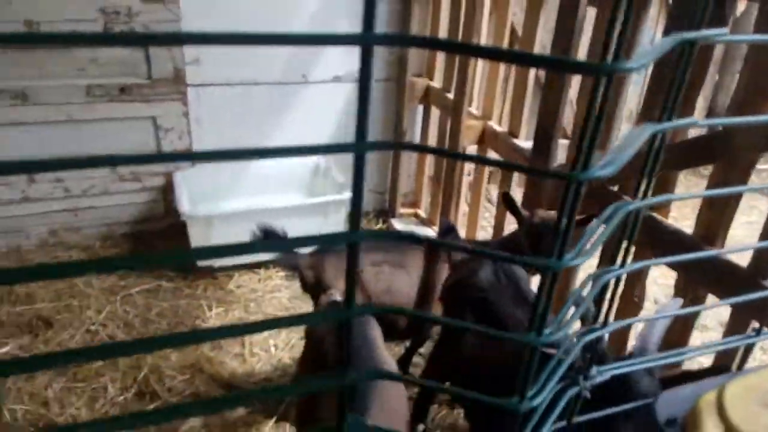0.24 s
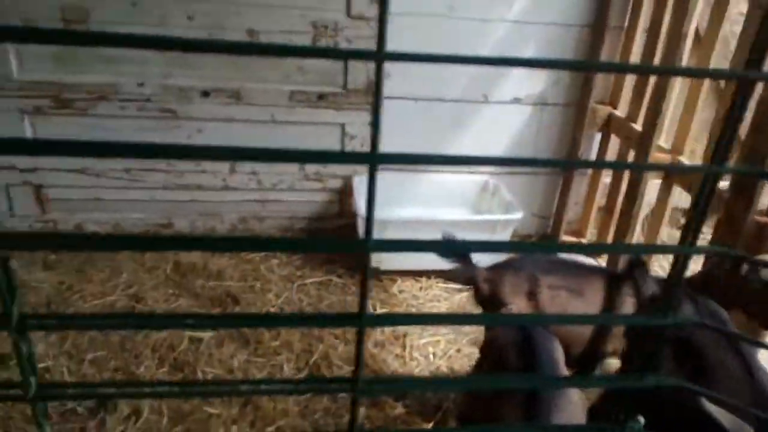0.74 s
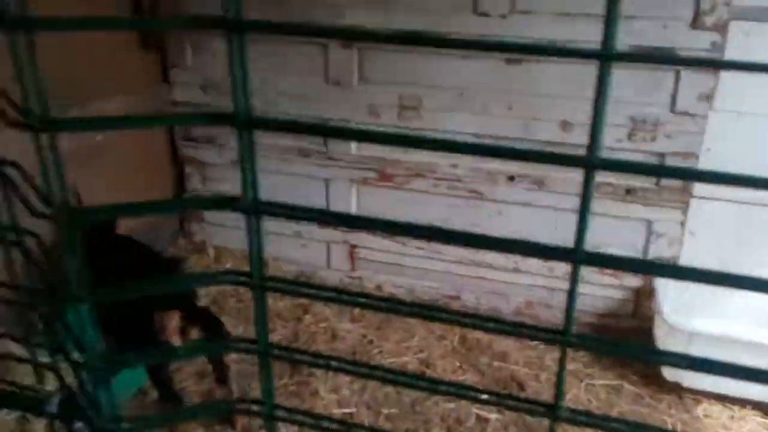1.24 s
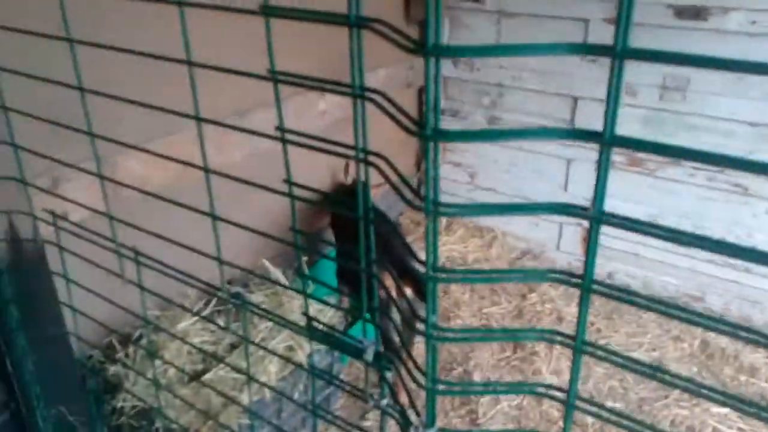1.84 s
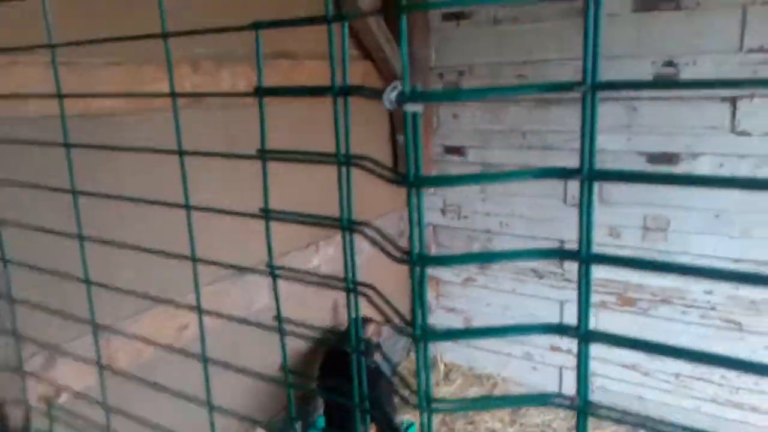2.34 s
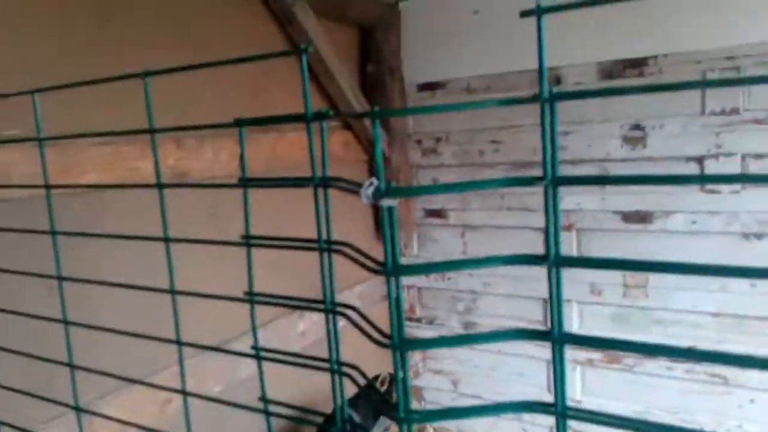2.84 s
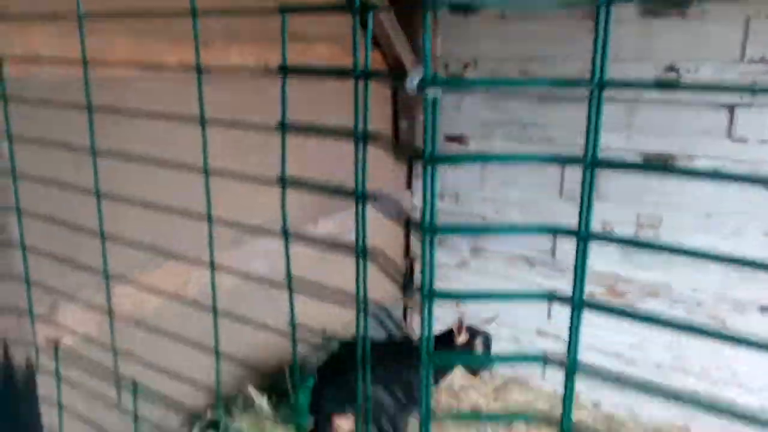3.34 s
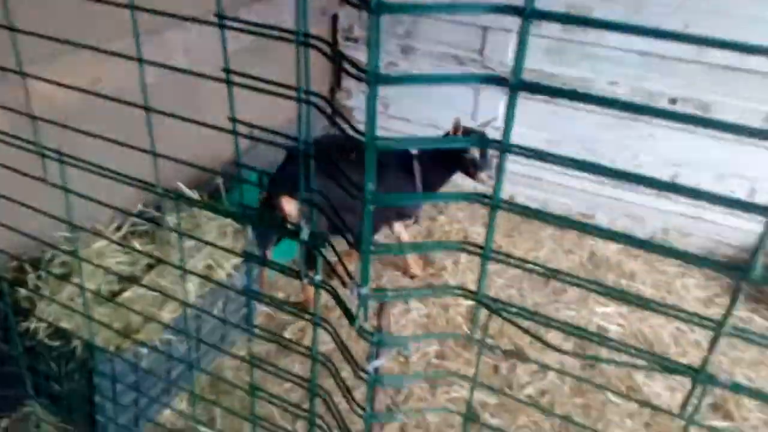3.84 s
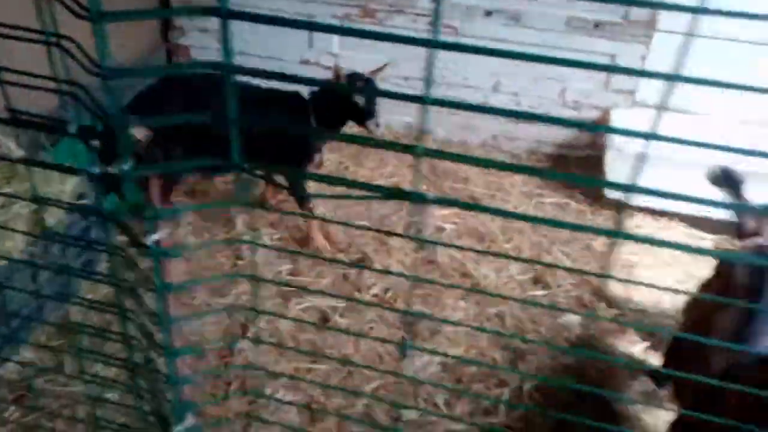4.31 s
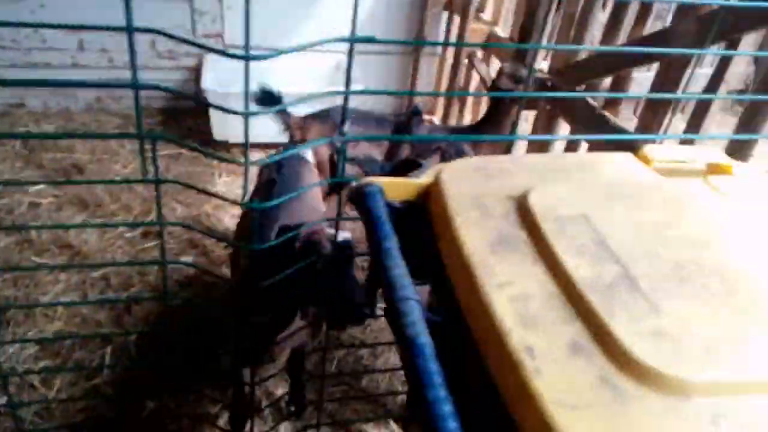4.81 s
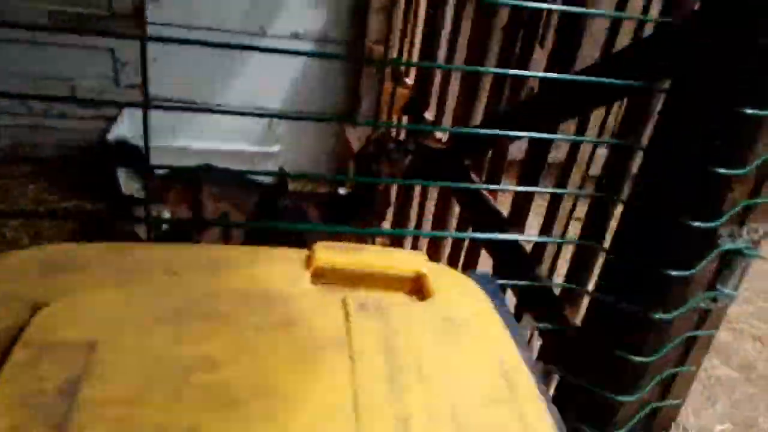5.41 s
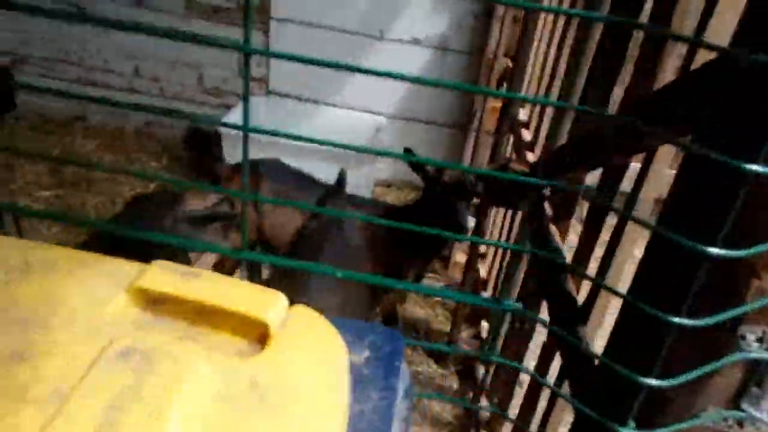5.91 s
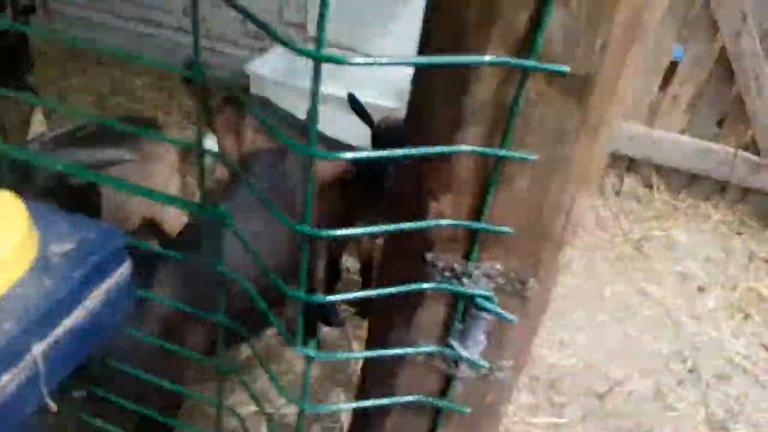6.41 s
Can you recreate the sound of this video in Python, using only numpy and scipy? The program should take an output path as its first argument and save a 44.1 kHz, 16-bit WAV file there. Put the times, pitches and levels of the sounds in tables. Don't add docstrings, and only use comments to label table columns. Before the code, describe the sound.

A goat pen in a wooden shed, heard close through a small stereo microphone with a very faint high whine for the first three seconds. From 0 s straw rustles and crackles with light knocks and snaps; harder board blows land at 0.65 and, loudest, 0.82 s. A hollow bin is pushed and knocked at 1.3 s and again near 1.6 s. From 1.9 to 2.5 s a goat gives a thin, short bleat broken by deep dips, with board knocks at 2.15 s. At 3.07 s a blow briefly rattles the mesh; a faint bird whistle slides down from 3.15 to 3.85 s, with dull knocks around 3.45 s. A steady bird note sounds at 3.9 s. From 4.2 to 5 s another goat bleats, deeply quavering, then more evenly. Light straw follows, with a far goat murmur at 5-5.5 s, a tiny squeak, a hinge squealing and creaking from 5.85 s, and a last chirp at 6.6 s.

```python
import sys
import numpy as np
from scipy import signal
from scipy.fft import rfft, irfft, next_fast_len
from scipy.io import wavfile
from scipy.ndimage import uniform_filter1d, map_coordinates

SR = 44100
rng = np.random.default_rng(int(sys.argv[2]) if len(sys.argv) > 2 else 0)


def invert_db(x):
    u = np.asarray(x, float) / 20
    return 10 ** u


def wav_record(signal):
    frames = np.transpose(np.atleast_2d(signal))
    bounded = np.clip(frames, -1, 1)
    quanta = np.round(bounded * 32767).astype(np.int16)
    wavfile.write(sys.argv[1], SR, quanta)


N = 293441


def unit(x):
    return x / np.sqrt(np.mean(x ** 2) + 1e-20)


def along(points, hz):
    f, v = np.transpose(points)
    return np.interp(np.log(hz + 1), np.log(f + 1), v)


def curves(rows):
    s, *cols = np.transpose(rows)
    t = np.arange(N) / SR
    gate = np.clip(np.minimum(t - s[0], s[-1] - t) / 0.0048, 0, 1) if s[0] > 0 else np.ones(N)
    return [np.interp(t, s, c) for c in cols] + [gate]


def swells(rows):
    s, half, *lifts = np.transpose(rows)[:, :, None]
    bell = np.exp(-((np.arange(N) / SR - s) / half) ** 2)
    return [(db * bell).sum(axis=0) for db in lifts]


def wobble(rate, live=slice(None)):
    coarse = np.arange(0, N + 32, 32)
    knots = rng.standard_normal(int(N * rate / SR) + 4)
    return np.interp(np.arange(N)[live], coarse, map_coordinates(knots, [coarse * rate / SR]))


def filtered(x, response):
    m = next_fast_len(N + 8192)
    return irfft(rfft(x, m) * response(np.fft.rfftfreq(m, 1 / SR)), m)[..., :N]


# (frequency [Hz], correlation [0-1])
PORT_LIKENESS = [(60, 0.64), (180, 0.89), (550, 0.21), (1650, 0.0092), (4970, 0.0076), (15000, 0.01)]


def likeness(hz):
    return np.clip(along(PORT_LIKENESS, hz), 0, 1)


# (frequency [Hz], t60 [s])
SHED_T60 = [(100, 0.35), (500, 0.17), (2000, 0.24), (7000, 0.14)]


def shed(x, length, reach=0.99):
    a, b = rng.standard_normal((2, int(.4 * SR)))
    hz, t, z = signal.stft(np.array([a, b]), SR, nperseg=256)
    like = likeness(hz)[:, None]
    z[1] = like * z[0] + np.sqrt(1 - like ** 2) * z[1]
    decay = invert_db(-60 * t / (reach * along(SHED_T60, hz)[:, None]))
    tail = signal.istft(z * decay, SR, nperseg=256)[1]
    return signal.fftconvolve(x[None], tail / np.linalg.norm(tail[0]), axes=1)[:, :length]


def tone(rows, overtone_db, unsteady, flutter_db=4.5):
    hz, level_db, gate = curves(rows)
    turn = 2 * np.pi * np.cumsum(hz * (1 + unsteady * wobble(60))) / SR
    level = invert_db(level_db - 1.0 + flutter_db * wobble(25)) * gate
    return level * (np.sin(turn) + invert_db(overtone_db) * np.sin(2 * turn))


# (time [s], pitch [Hz], level [dB])
WHINE_PATH = [(0.0, 8285, -82), (0.01, 8370, -88.5), (1.5, 8150, -89), (3.05, 7950, -85.5),
              (3.1, 8260, -106)]


def camera_whine():
    return tone(WHINE_PATH, overtone_db=-53, unsteady=0.0013) * invert_db([[3], [-3]])


def rush(spectrum, patchy_db, grain_db):
    grains = rng.exponential(size=N // 40 + 1).repeat(40)[:N]
    spikes = invert_db(grain_db * uniform_filter1d(grains, size=60) / 2)
    z = signal.stft(rng.standard_normal((2, N)) * spikes, nperseg=1024)[2]
    field = rng.standard_normal(z.shape[1:])
    field = uniform_filter1d(uniform_filter1d(field, size=5, axis=0), size=5, axis=1)
    pair = signal.istft(z * invert_db(patchy_db * unit(field)), nperseg=1024)[1][:, :N]

    def mid_side(hz):
        angle = np.arccos(likeness(hz)) / 2
        return invert_db(along(spectrum, hz)) * [np.cos(angle), np.sin(angle)]

    mid, side = filtered(pair, mid_side)
    return unit(np.array([mid + side, mid - side]))


# (frequency [Hz], level [dB])
RUMBLE_COLOUR = [(12, -44.5), (20, -18.5), (70, 2), (176, -7), (231, -17.5), (268, -4.5), (300, -11.5),
                 (390, -59), (660, -120)]
RUSTLE_COLOUR = [(88, -13.5), (150, -5), (238, -8), (511, 1), (669, -5), (715, -1.5), (846, -3.5),
                 (2200, -11.5), (2860, -12), (4840, -120)]
CRACKLE_COLOUR = [(710, -26), (1200, -15), (1640, -37), (2080, -6), (2650, -1.5), (2840, -0.5), (3190, 1.5),
                  (3870, 2), (5340, 2.5), (6160, -1.5), (9000, -34.5), (11700, -64), (19800, -120)]
FIZZ_COLOUR = [(5000, -36.5), (8500, -6), (10600, -4.5), (14100, -2), (15300, 0), (15600, -31)]
# (time [s], rustle level [dB])
BUSYNESS = [(0, -49), (.6, -51), (.74, -59), (.9, -53.5), (1.32, -71), (1.614, -51), (1.9, -56.5),
            (2.3, -58), (2.78, -64.5), (3.21, -64.5), (3.29, -58.5), (3.56, -61.5), (3.7, -68.5),
            (4.12, -63), (5.05, -59), (5.29, -64.5), (5.95, -69.5), (6.65, -67)]
# (time [s], half length [s], rustle lift [dB])
BEDDING_DRAGS = [(.33, 0.046, -4.5), (.49, 0.017, -4), (1.22, 0.039, 2), (1.88, 0.043, 5),
                 (1.97, 0.025, -8), (2.93, 0.12, -0.5), (5.2, .08, -3), (1.76, 0.041, 2), (5.47, 0.073, 1),
                 (5.71, 0.025, 3), (5.82, 0.052, -4.5), (6.18, 0.045, 6)]
# (time [s], half length [s], rumble lift [dB])
BODY_SHOVES = [(0.0, 0.091, 6), (.48, .08, 9), (1.0, 0.29, 15.5), (1.466, 0.12, 16.5), (1.68, 0.11, 14),
               (2.28, 0.13, 14.5), (3.16, .12, 19.5), (3.56, 0.12, 12.5), (5.47, 0.18, 11.5),
               (5.95, 0.11, 7.5), (6.36, 0.22, 7.5)]
# (time [s], half length [s], crackle lift [dB], fizz lift [dB])
STRAW_SCUFFS = [(.1, 0.29, 3.5, 7.5), (.55, 0.098, 7, 14.5), (.83, 0.012, -6.5, 20.5),
                (1.02, 0.037, 4.5, 2), (1.88, 0.029, 3, 2), (2.5, 0.15, 7, 2), (2.62, 0.03, 9, 13),
                (2.0, 0.025, 1.5, 7), (5.15, 0.11, 3.5, 1), (5.95, .08, 1.5, 2), (6.38, 0.05, 1.5, 3),
                (3.33, 0.032, 8, 13), (3.865, 0.025, 7, 3), (3.91, .04, 2, .5), (1.65, 0.016, 6, 1),
                (4.75, 0.14, .1, 3.5), (4.31, 0.027, -6, 8), (5.43, 0.083, 2, -1), (5.72, 0.087, 5, 4),
                (6.17, 0.22, 4.5, 3.5), (6.54, 0.037, 6.5, 10)]


def straw():
    rustle_db = curves(BUSYNESS)[0] + swells(BEDDING_DRAGS)[0]
    shove_db, = swells(BODY_SHOVES)
    scuff_db, fizz_db = swells(STRAW_SCUFFS)
    busier_db = rustle_db + 61
    rumble_db = -73.5 + 0.18 * busier_db + shove_db
    crackle_db = -62.5 + 0.41 * busier_db + scuff_db
    stir = wobble(6.4)
    rumble = invert_db(rumble_db + 3 + 2.5 * wobble(9)) * rush(RUMBLE_COLOUR, patchy_db=2, grain_db=0)
    rustle = invert_db(rustle_db + 3 + 1.2 * stir + 1.5 * wobble(25))
    rustle = rustle * rush(RUSTLE_COLOUR, patchy_db=2.2, grain_db=3.5)
    crackle = invert_db(crackle_db + 2.2 + 1.2 * stir + .8 * wobble(25))
    crackle = crackle * rush(CRACKLE_COLOUR, patchy_db=1.4, grain_db=3.5)
    fizz = invert_db(-88.5 + fizz_db + 1.5) * rush(FIZZ_COLOUR, patchy_db=1.0, grain_db=3.5)
    return (rumble + rustle + crackle) * invert_db([[-.6], [.6]]) + fizz * invert_db([[1.5], [-1.5]])


# (time [s], lag of the left port [samples])
LEFT_LAG = [
    (0, 6),
    (.65, 8),
    (.83, 10),
    (1.3, 4),
    (1.6, 2),
    (2.15, -7),
    (3.07, 0),
    (3.45, 2),
    (6.6, 2),
]


def left_lag(s):
    return np.interp(s, *np.transpose(LEFT_LAG))


# (time [s], peak [dB], strongest mode [Hz], crack [dB], t60 [s])
BOARD_BLOWS = [(.007, -26, 580.5, -21, 0.21), (.143, -29, 356, -17, 0.14), (.217, -33, 1283, -14.5, 0.16),
               (.645, -25, 748, -22, 0.2), (.65, -26, 241, -27.5, 0.22), (.654, -18.5, 744, -23, 0.11),
               (.821, -10.5, 381, -22, 0.17), (.837, -15.5, 330, -24, 0.15),
               (1.59, -28.5, 1022, -35, 0.087), (2.153, -20.5, 163, -18.5, .08),
               (2.16, -19, 278, -20, 0.13), (2.168, -21.5, 517, -28.5, 0.15),
               (2.219, -20.5, 275, -22.5, 0.11), (2.232, -31, 851, -31, 0.15),
               (3.069, -19.5, 256, -25.5, 0.081), (3.074, -23, 787, -20.5, 0.15),
               (3.088, -30, 818, -26, 0.2), (3.103, -26.5, 927, -17, 0.077), (3.11, -23, 697, -19.5, 0.18),
               (3.431, -19, 255.6, -47, 0.16), (3.444, -19, 399, -34, 0.14),
               (3.456, -21.5, 603, -31, 0.079), (3.467, -15, 711, -31, 0.14),
               (3.481, -14.5, 705, -38, 0.078)]
# (time [s], peak [dB], strongest mode [Hz], crack [dB], t60 [s])
BIN_BLOWS = [
    (.259, -35, 305, -23.5, 0.084),
    (.392, -34, 810, -8, 0.22),
    (1.293, -34, 150, -65, 0.2),
    (1.318, -27, 175, -65, 0.15),
    (1.337, -14.5, 731, -15.5, 0.17),
    (1.34, -18, 278, -21.5, 0.18),
    (1.583, -21.5, 445, -28, 0.13),
    (1.629, -28, 450, -28, 0.082),
    (4.049, -53.5, 610, 2, 0.12),
    (6.328, -50, 274, -10, 0.077),
]
# (time [s], peak [dB], strongest mode [Hz], crack [dB])
STRAW_STEPS = [(.44, -36.5, 347, -20), (.511, -34.5, 294, -6.5), (.571, -37, 289, -4.5),
               (2.57, -45, 269, -18), (2.61, -44.5, 498, -1.5), (3.279, -40.5, 344, -16),
               (3.308, -34, 614, -12), (3.322, -38.5, 956, -3.5), (3.382, -37, 733, -20),
               (5.42, -54, 523, -40), (6.166, -43.5, 527, -22)]


def blows():
    steps = [(*row, 0.19) for row in STRAW_STEPS]
    kinds = [(BOARD_BLOWS, -18.5), (BIN_BLOWS, -8), (steps, -18)]
    return sorted((s, db, hz, thump_db, crack_db, t60)
                  for rows, thump_db in kinds for s, db, hz, crack_db, t60 in rows)


# (frequency [Hz], level [dB], share of the blow's t60)
BOARD_MODES = [(103.7, -10.5, 1.98), (150, -16.5, 1.77), (235, -3.5, 1.43), (330, -5, 1.23),
               (387.3, -4.5, 0.96), (459.4, -5, 0.95), (573, -12, 1.1), (646, -14.5, 1.2), (705, 0.5, 0.63),
               (851, -9.5, 0.63), (1045, -17, 0.67), (1190, -14, 0.54)]
# (frequency [Hz], level [dB per Hz])
THUD_COLOUR = [(59, -43.5), (100, -14.5), (207, -6), (546, -7), (705, -4.5), (1350, -12), (2500, -12.5),
               (3250, -60), (5500, -120)]
# (frequency [Hz], level [dB])
MIC_RESPONSE = [(30, -10.5), (70, 1.5), (5500, -2.5), (7000, -14.5), (8200, -34.5), (10000, -44.5),
                (15000, -46)]


def knocks():
    out, t = np.zeros((2, N + SR)), np.arange(SR // 2) / SR
    hz, level_db, share = np.transpose(BOARD_MODES)[:, :, None]
    grid = np.fft.rfftfreq(len(t), 1 / SR)
    for s, db, main_hz, thump_db, crack_db, t60 in blows():
        rise_s = 0.0019 if db > -34 else 0.0051
        luck = rng.standard_normal((3, len(hz), 1))
        near_db = (0.11 * crack_db - 3.0) * np.abs(np.log2(hz / main_hz))
        near_db = near_db + np.where(hz < 200, thump_db + 18.0, 0)
        ring = invert_db(level_db + near_db + 2.4 * luck[0] - 60 * t / (t60 * share))
        ring = ring * np.sin(2 * np.pi * hz * (1 + 0.019 * luck[1]) * t + 0.88 * luck[2])
        main = invert_db(-60 * t / (0.64 * t60)) * np.sin(2 * np.pi * main_hz * t)
        chatter = rng.standard_normal(600) * invert_db(-60 * t[:600] / 0.037) * (rng.random(600) < .02)
        chatter[0] = 2.4
        chatter = chatter / np.linalg.norm(chatter)
        wood = signal.fftconvolve(ring.sum(axis=0) + 1.6 * main, chatter)[:len(t)]
        wood *= 2.48 / np.abs(wood).max()

        noise = rng.standard_normal((2, 2, len(t)))
        noise[0, 1] = 0.71 * noise[0, 0] + 0.62 * noise[0, 1]
        octaves = np.log2((grid + 1) / main_hz)
        lean = invert_db(np.where(octaves > 0, 0.22 * crack_db, 4) * octaves)
        thud = unit(irfft(rfft(noise[0]) * invert_db(along(THUD_COLOUR, grid)) * lean, len(t)))
        thud = thud * invert_db(-3 - 60 * t / (0.78 * t60))
        crack = unit(irfft(rfft(noise[1]) * grid / (grid + 900), len(t)))
        crack = crack * (invert_db(-60 * t / 0.077) + invert_db(-3.5 - 60 * t / (0.5 * t60)))

        blow = (wood + thud + invert_db(crack_db + 15.0) * crack) * (1 - np.exp(-t / rise_s))
        lag = round(left_lag(s) + rng.integers(-12, 13) / 8)
        blow = np.array([np.roll(blow[0], max(lag, 0)), np.roll(blow[1], max(-lag, 0))])
        tail = shed(np.pad(blow[0], (130, 0)), len(t))
        sound = invert_db([[-.8], [.8]]) * blow + invert_db(-13.5) * tail
        out[:, round(s * SR):][:, :len(t)] += invert_db(db - 7) * sound
    return filtered(out[:, :N], lambda hz: invert_db(along(MIC_RESPONSE, hz)))


# (time [s], peak [dB], centre [Hz], t60 [s])
STRAW_SNAPS = [(.021, -33, 700, 0.068), (0.09, -43, 920, .1), (.144, -37, 800, .1),
               (.158, -44.5, 1870, .08), (.218, -38, 1450, 0.079), (0.223, -43.5, 2700, 0.086),
               (.231, -39, 750, .1), (.397, -38, 800, 0.078), (.398, -47, 1500, 0.072),
               (0.4, -45, 1000, .06), (.53, -42.5, 500, 0.13), (1.62, -44, 1020, 0.053),
               (1.8, -38, 900, 0.061), (1.738, -42, 870, .06), (2.152, -45, 5430, .04),
               (2.172, -37.5, 1410, .06), (2.7, -45, 4800, .04), (4.3, -58, 1274, 0.18),
               (5.31, -60.5, 2200, 0.19), (5.409, -59, 2580, .2), (5.44, -59.5, 2120, .15),
               (5.56, -66, 2100, 0.16), (5.2, -64, 2620, .2), (6.13, -57, 950, 0.15), (3.352, -47, 720, .2),
               (3.31, -50, 1700, 0.17), (3.385, -50, 1800, 0.091), (3.17, -42, 700, 0.094),
               (3.445, -48, 5200, 0.087), (1.375, -34.5, 704, 0.19), (.66, -39.5, 1200, 0.13),
               (.652, -33, 750, .13), (.838, -22, 388, .15), (2.608, -52, 4200, .12),
               (2.598, -55, 5800, .06), (2.22, -48, 5100, .06), (3.645, -58, 4120, .2),
               (3.69, -60, 3800, .15), (4.07, -58, 5400, .15), (4.8, -58, 67, .3), (5.51, -57, 71, 0.33),
               (3.08, -47, 79, 0.28), (2.2, -50, 68, 0.33), (5.43, -60, 800, .3), (5.6, -60, 610, 0.22),
               (6, -60, 530, .25), (5.56, -62, 526, .4), (1.935, -41, 258, .14), (1.585, -44, 1030, .08)]


def snaps():
    out, t = np.zeros((2, N + SR)), np.arange(SR // 4) / SR
    grid = np.fft.rfftfreq(len(t), 1 / SR)
    for s, db, centre_hz, t60 in STRAW_SNAPS:
        a, b = rng.standard_normal((2, len(t)))
        band = np.exp(-(np.log2((grid + 1) / centre_hz) / 0.15) ** 2)
        puff = unit(irfft(rfft([a, 0.62 * a + .8 * b]) * band, len(t)))
        out[:, round(s * SR):][:, :len(t)] += invert_db(db - 60 * t / t60) * (1 - np.exp(-t / 0.0038)) * puff
    return out[:, :N]


# (time [s], peak [dB], pitch [Hz], t60 [s])
CLEAR_TAPS = [(.022, -30, 590, .05), (.65, -22, 750, 0.092), (.664, -37, 1254, 0.062),
              (.628, -38, 310, .06), (.7, -36, 235, .2), (.705, -39, 742, 0.057), (.822, -14, 380.6, .07),
              (.838, -21, 760, .05), (.826, -27, 1000, .1), (1.294, -28.5, 135, 0.064),
              (1.304, -19, 170.5, .07), (1.342, -20, 300, .04), (1.378, -26, 235, .14),
              (1.584, -25, 298, .035), (1.585, -34, 1030, 0.083), (1.597, -26, 500, 0.054),
              (1.615, -40, 1030, 0.055), (1.626, -34, 430, 0.048), (3.436, -29, 700, 0.13),
              (3.488, -19, 360, .05), (3.494, -23, 650, 0.033), (3.515, -35, 450, 0.069),
              (3.575, -40, 340, .05)]


def taps():
    out, t = np.zeros((2, N + SR)), np.arange(SR // 4) / SR
    for s, db, hz, t60 in CLEAR_TAPS:
        late = left_lag(s) / SR * np.array([[.5], [-.5]])
        level = invert_db(db + 3 - 60 * t / t60 + np.array([[-1], [1]])) * (1 - np.exp(-t / 0.0028))
        out[:, round(s * SR):][:, :len(t)] += level * np.sin(2 * np.pi * hz * (t - late))
    return out[:, :N]


def quaver(pushes, edge_s, onset_db, sag_hz, sag_hz_per_db, close_db, breath_db, leak_db,
           nasal_db, nasal_s, dip_nasal_db, nose_per_db):
    first, last = pushes[0], pushes[-1]
    chain = [(first[0] - edge_s, *first[1:4], onset_db)] + list(pushes) + [(last[0] + edge_s, *last[1:])]
    fall_level, shoulder_level, shoulder_sag = .4, 0.36, .4
    leaking_db = breath_db + leak_db
    rows = []  # (s, pitch Hz, level dB, mouth dB, breath dB, nose dB)
    for (s, hz, db, mouth_db, dip_db), (s2, hz2, db2, mouth2_db, _) in zip(chain, chain[1:]):
        gap_s = s2 - s
        sag = sag_hz + sag_hz_per_db * dip_db
        early = min(np.exp((first[0] - s) / nasal_s), 1)
        dip_nose_db = dip_nasal_db + nose_per_db * dip_db
        shoulder_nose_db = dip_nasal_db + 0.85 * (nasal_db - dip_nasal_db) * min(dip_db / 15, 1)
        push = (s, hz, db, mouth_db, breath_db + leak_db * early, nasal_db * early)
        fall = (s + .22 * gap_s, hz - fall_level * sag, db - fall_level * dip_db,
                mouth_db - close_db / 2, leaking_db, dip_nose_db / 2)
        dip = (s + .44 * gap_s, (hz + hz2) / 2 - sag, (db + db2) / 2 - dip_db,
               (mouth_db + mouth2_db) / 2 - close_db, breath_db + leak_db * (1 + dip_db / 15), dip_nose_db)
        shoulder = (s + .72 * gap_s, hz2 - shoulder_sag * sag - (hz2 - hz) / 4,
                    db2 - shoulder_level * dip_db, mouth2_db - close_db, leaking_db, shoulder_nose_db)
        rows += [push, fall, dip, shoulder]
    s, hz, db, mouth_db, air_db, _ = rows[-2]
    release = (s + .055, hz, db - 18, mouth_db, air_db, 13)
    return rows[2:-1] + [release]


# (frequency [Hz], width [Hz], level [dB])
PEN_RESONANCES = [(1052, 20, 15), (1393, 18, 10), (1634, 34, 5.5), (3030, 180, 5.5), (3350, 50, -1),
                  (4035, 145, 7.5), (4560, 35, -9)]


def bleat(rows, throat, gain_db, jitter, drift_db, turn_hz, wet_db):
    pitch, level_db, open_db, breath_db, nasal_db, gate = curves(rows)
    live = gate > 0
    pitch = uniform_filter1d(pitch, size=650)
    cycles = np.cumsum((pitch * (1 + jitter * wobble(90)))[live]) / SR
    nose_db = nasal_db[live]

    def upper(hz):
        return 1 / (1 + (turn_hz / (hz + 1)) ** 4)

    voice = np.zeros((2, N))
    walls_db = 1.5 * rng.standard_normal((2, 200))
    for k in range(1, 30):
        hz = k * pitch[live]
        drift = drift_db * min(k / 3, 1 + (k > 11) * .7) * wobble(45, live)
        size_db = along(throat, hz) + upper(hz) * open_db[live] + drift
        size_db += sum(db / (1 + ((hz - c) / w) ** 2) for c, w, db in PEN_RESONANCES)
        size_db += (k == 3) * np.minimum(nose_db, 0)
        size_db += (k == 2) * nose_db + np.maximum(nose_db, 0) / (1 + ((hz - 4560) / 250) ** 2)
        comb_db = [np.interp(hz / 70, np.arange(200), w) * upper(hz) for w in walls_db]
        phase = [[.5 * k], [.5 * k + 0.21 * k * rng.normal()]]
        voice[:, live] += invert_db(size_db + comb_db) * np.sin(2 * np.pi * k * cycles + phase)

    puff = np.zeros(N)
    puff[live] = 1 + 0.29 * np.cos(2 * np.pi * cycles)
    air = rng.standard_normal((2, N)) * puff
    rasp_db = -13 / (1 + np.exp((4.6 - np.arange(N) / SR) / .03))

    def colour(hz):
        mouth_rasp = 5 / (1 + ((hz - 980) / 150) ** 2)
        return invert_db(along(throat, hz)) * (0.73 + upper(hz) + mouth_rasp)

    def high(hz):
        return 1 / (1 + (2600 / (hz + 1)) ** 6)

    breath = invert_db(rasp_db) * filtered(air, lambda hz: colour(hz) * (1 - high(hz)))
    breath += invert_db(.2 * rasp_db) * filtered(air, lambda hz: colour(hz) * high(hz))
    sound = invert_db(level_db + gain_db) * gate * (voice + invert_db(breath_db + open_db + 17.0) * breath)
    tail = shed(np.pad(sound[0], (200, 0)), N, reach=0.72)
    return sound * invert_db([[-.9], [.9]]) + invert_db(wet_db) * tail


# (frequency [Hz], level [dB])
SHORT_BLEAT_THROAT = [(150, -40), (250, 6.5), (344, -4), (501, -12), (963, -4.5), (1360, -5), (1930, -6),
                      (2820, -5), (3350, 5), (3820, -22), (4290, 2), (4800, 2.5), (5600, -13), (6200, -4),
                      (6820, -15), (8000, -22), (10400, -65), (17600, -120)]
# (time [s], pitch [Hz], level [dB], mouth opening [dB], dip after [dB])
SHORT_BLEAT_PUSHES = [
    (1.948, 242, -51.5, -40, 15.5),
    (2.022, 306, -48, -12.5, 32),
    (2.142, 329.6, -45, -9, 4.5),
    (2.252, 336.8, -49, -1.5, 16.5),
    (2.354, 337.5, -52, 3.5, 22),
    (2.47, 326.5, -55.5, 0.5, 15),
]


def short_bleat():
    rows = quaver(SHORT_BLEAT_PUSHES, edge_s=.07, onset_db=9.0, sag_hz=5, sag_hz_per_db=0.46, close_db=11.5,
                  breath_db=-10, leak_db=-1, nasal_db=1.0, nasal_s=0.22, dip_nasal_db=-1.0, nose_per_db=0.38)
    return bleat(rows, SHORT_BLEAT_THROAT, gain_db=0.5, jitter=.0018, drift_db=3, turn_hz=1470, wet_db=-10.5)


# (frequency [Hz], level [dB], t60 [s])
MESH_MODES = [(1550, -2, .05), (1703, 2, .06), (2130, -5.5, .05), (2930, 1.5, 0.064), (4670, -4.5, .05),
              (5720, -11, .05)]
# (time [s], level [dB], brightness [dB per octave])
MESH_RATTLES = [
    (3.069, -42, -10),
    (3.077, -45, -5),
    (3.098, -51, 4),
    (3.105, -43.5, 4),
    (3.113, -41, 1),
    (3.124, -43, 1),
    (3.134, -56, 4),
]


def mesh_rattle():
    out, t = np.zeros((2, N + SR)), np.arange(SR // 4) / SR
    hz, level_db, ring_t60 = np.transpose(MESH_MODES)[:, :, None]
    for s, db, bright_db in MESH_RATTLES:
        luck = rng.standard_normal((2, 2, len(hz), 1))
        mode_db = level_db + bright_db * np.log2(hz / 2500) + 1.6 * luck[0]
        ring = invert_db(mode_db - 60 * t / ring_t60) * np.sin(2 * np.pi * hz * t + luck[1])
        out[:, round(s * SR):][:, :len(t)] += invert_db(db) * ring.sum(axis=1) * (1 - np.exp(-t / 0.00092))
    return out[:, :N]


# (time [s], pitch [Hz], level [dB])
FALLING_WHISTLE = [
    (3.14, 8000, -86),
    (3.25, 7530, -77),
    (3.4, 6870, -74),
    (3.58, 5850, -66.5),
    (3.72, 5280, -70),
    (3.85, 4900, -74),
]


def falling_whistle():
    return tone(FALLING_WHISTLE, overtone_db=-41, unsteady=0.0119, flutter_db=3.0)


# (time [s], pitch [Hz], level [dB])
BIRD_NOTE = [
    (3.88, 2630, -68),
    (3.97, 2600, -64),
    (4.05, 2620, -65),
    (4.11, 2620, -71),
    (4.14, 2650, -80),
]


def bird_note():
    return tone(BIRD_NOTE, overtone_db=-32, unsteady=0.0012, flutter_db=1.5)


# (frequency [Hz], level [dB])
LONG_BLEAT_COLOUR = [(150, -7), (270, -3.5), (430, -8), (550, -6.5), (830, -4.5), (1100, -18), (1400, -20),
                     (1650, -13.5), (2200, -20.5), (2750, -14), (3050, -5.5), (3500, -18.5), (3850, -9),
                     (4300, -6), (6000, -13.5), (7000, -20), (7500, -59.5)]
# (time [s], pitch [Hz], level [dB], mouth opening [dB], dip after [dB])
LONG_BLEAT_PUSHES = [
    (4.2, 244, -41.5, -6, 21),
    (4.315, 278.5, -39, 1, 19),
    (4.425, 275.9, -38, -.5, 16),
    (4.535, 279.6, -39.5, -2.5, 4),
    (4.638, 287, -40, -1, 2.5),
    (4.733, 285.5, -40, 0.5, 2.5),
    (4.835, 281.3, -41, 0.5, 3.5),
    (4.937, 277.3, -39.5, -3.5, 9),
]


def long_bleat():
    rows = quaver(LONG_BLEAT_PUSHES, edge_s=.1, onset_db=24.5, sag_hz=15, sag_hz_per_db=1.5, close_db=4.5,
                  breath_db=-15, leak_db=9.0, nasal_db=15, nasal_s=0.072, dip_nasal_db=-11.5, nose_per_db=1.15)
    return bleat(rows, LONG_BLEAT_COLOUR, gain_db=1.5, jitter=.0015, drift_db=2.5, turn_hz=1100, wet_db=-8)


# (time [s], pitch [Hz], level [dB])
MURMUR = [
    (5.03, 464.5, -61),
    (5.15, 478.3, -66),
    (5.33, 459, -67),
    (5.38, 483, -90),
    (5.45, 502, -59),
    (5.55, 480, -74),
]


def far_murmur():
    return tone(MURMUR, overtone_db=-20.0, unsteady=0.0698)


# (time [s], pitch [Hz], level [dB])
FAINT_SQUEAK = [
    (5.47, 1179, -73),
    (5.556, 1085, -62.5),
    (5.62, 1135, -77),
]


def faint_squeak():
    return tone(FAINT_SQUEAK, overtone_db=-5.5, unsteady=0.0133)


# (time [s], pitch [Hz], level [dB])
HINGE_START = [
    (5.85, 1110, -78),
    (5.88, 1100, -71),
    (5.95, 1090, -74),
]


def hinge_start():
    return tone(HINGE_START, overtone_db=-26, unsteady=.008)


# (time [s], pitch [Hz], level [dB])
HINGE_SWING = [
    (5.98, 1125, -82),
    (6.034, 1292, -69),
    (6.21, 1136, -71),
    (6.22, 1300, -72),
    (6.42, 1184, -70),
]


def hinge_swing():
    return tone(HINGE_SWING, overtone_db=-26, unsteady=0.009)


# (time [s], pitch [Hz], level [dB])
HINGE_CREAK = [
    (6.41, 690, -72),
    (6.46, 756, -67),
    (6.53, 1010, -59),
    (6.575, 953, -63),
    (6.6, 895, -68),
    (6.65, 935, -58),
]


def hinge_creak():
    return tone(HINGE_CREAK, overtone_db=-17, unsteady=.026)


# (time [s], pitch [Hz], level [dB])
LAST_CHIRP = [
    (6.58, 4400, -78),
    (6.61, 4300, -66),
    (6.65, 4300, -64),
]


def chirp():
    return tone(LAST_CHIRP, overtone_db=-40, unsteady=.012)


def scene():
    near = camera_whine() + straw() + knocks() + snaps() + taps() + short_bleat() + mesh_rattle() + long_bleat()
    birds = falling_whistle() + bird_note() + chirp()
    far = far_murmur() + faint_squeak() + hinge_swing() + hinge_creak()
    far = far + invert_db(-2) * shed(far, N)
    return near + birds + far + hinge_start()


def band_limit(x):
    return signal.sosfilt(signal.butter(12, 16060, fs=SR, output="sos"), x)


def record(dry):
    return band_limit(dry)


dry = scene()
out = record(dry)
wav_record(out)
```